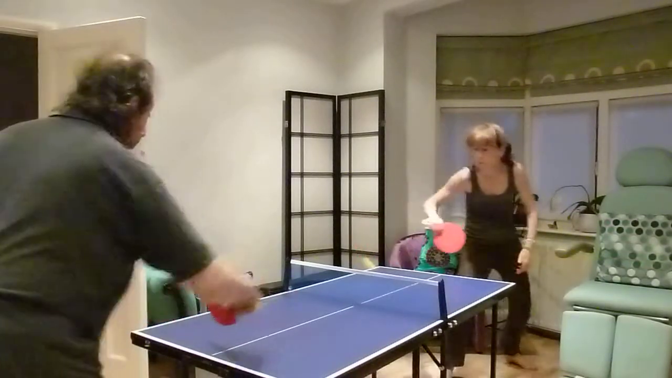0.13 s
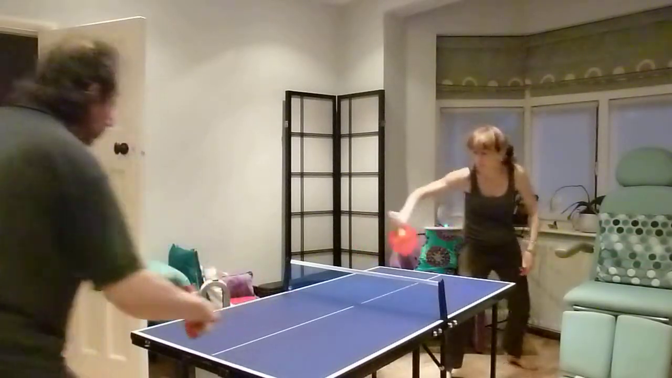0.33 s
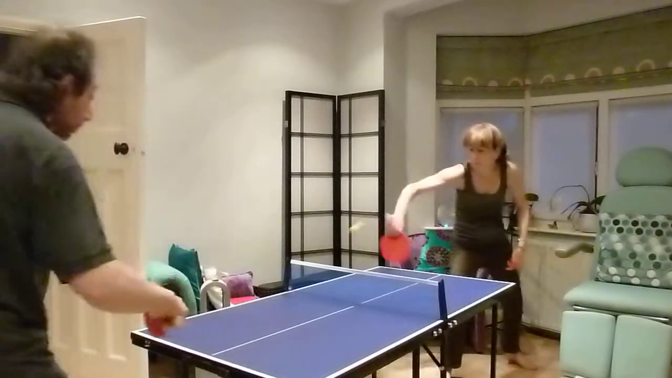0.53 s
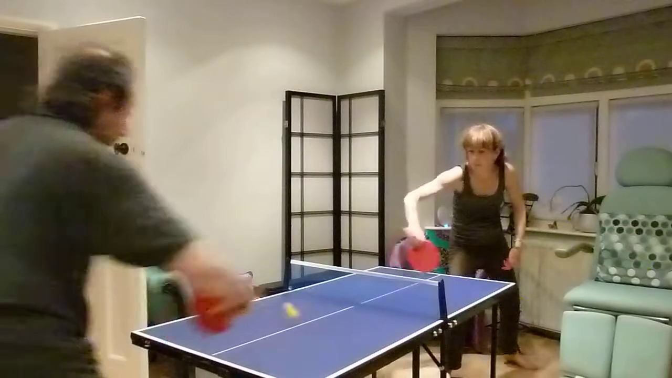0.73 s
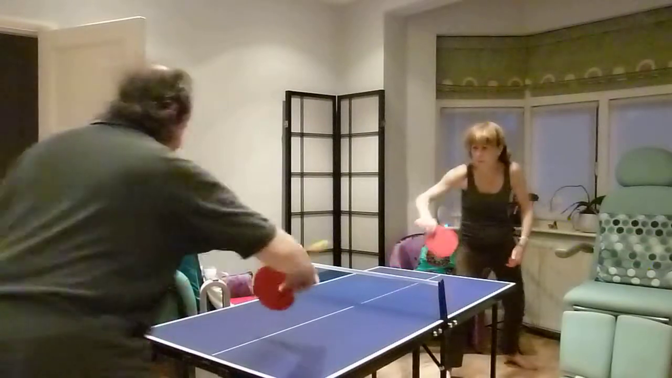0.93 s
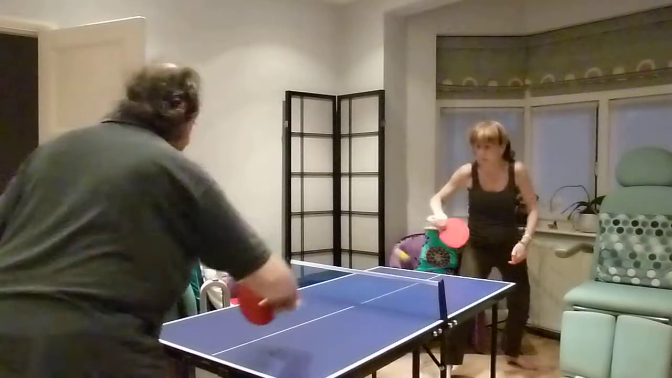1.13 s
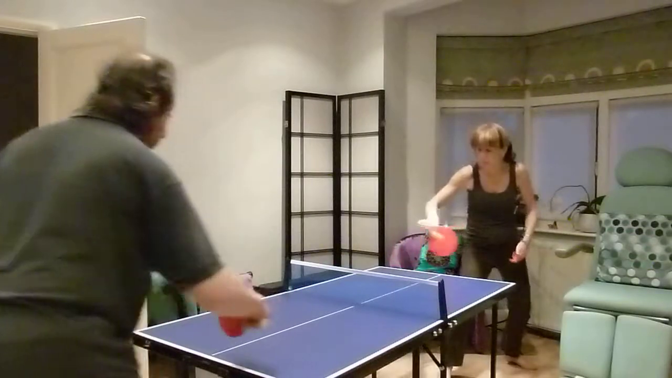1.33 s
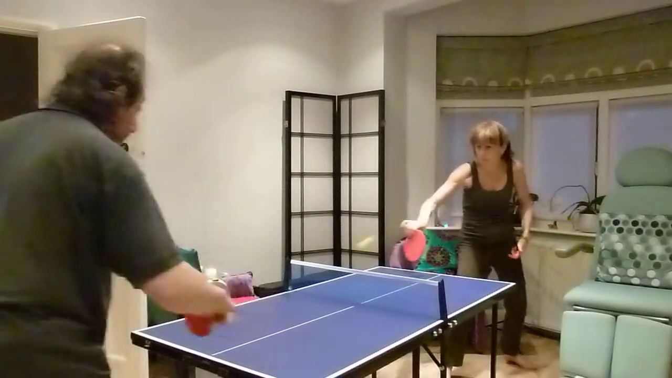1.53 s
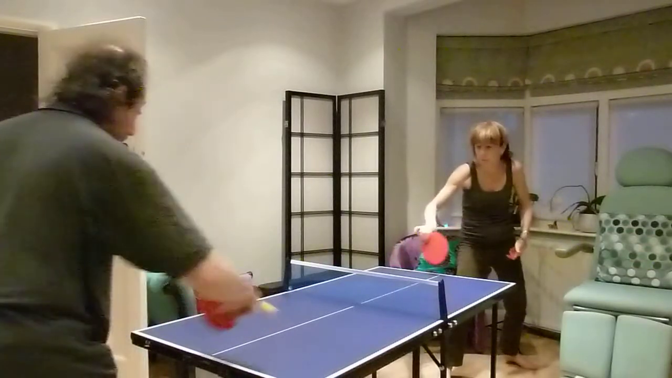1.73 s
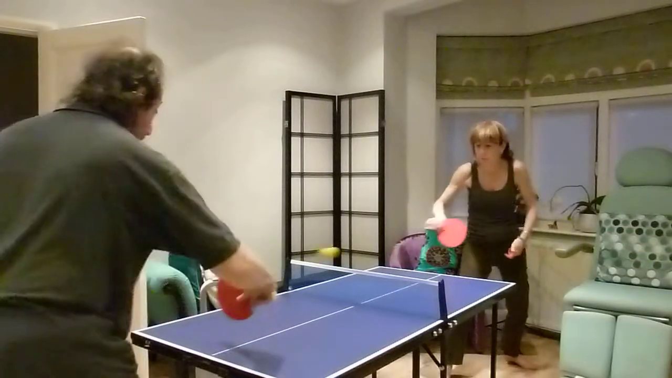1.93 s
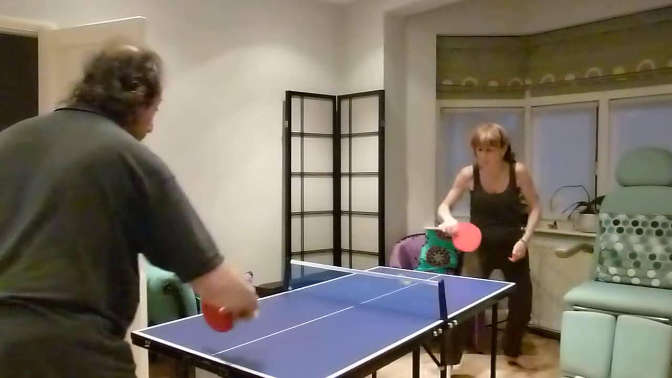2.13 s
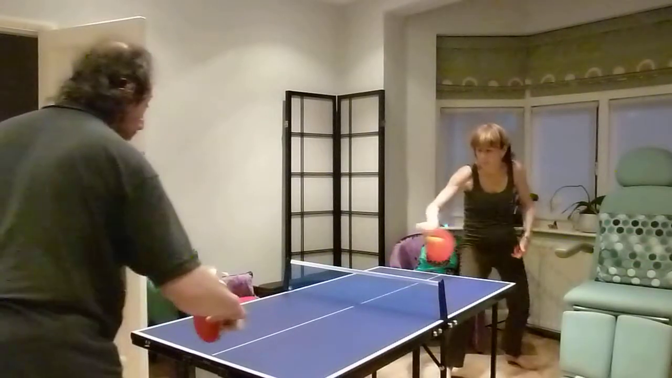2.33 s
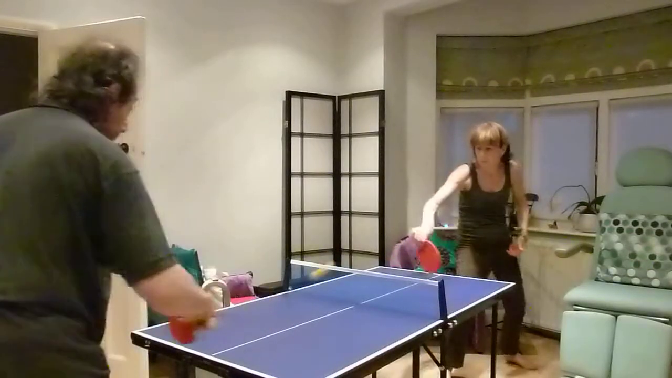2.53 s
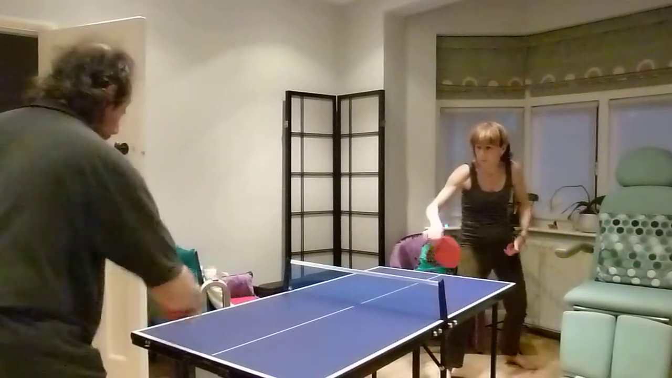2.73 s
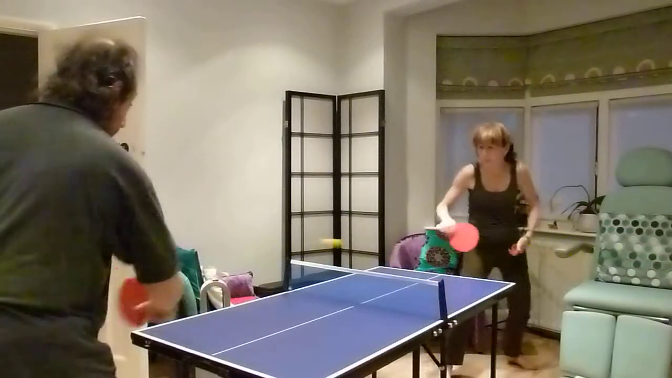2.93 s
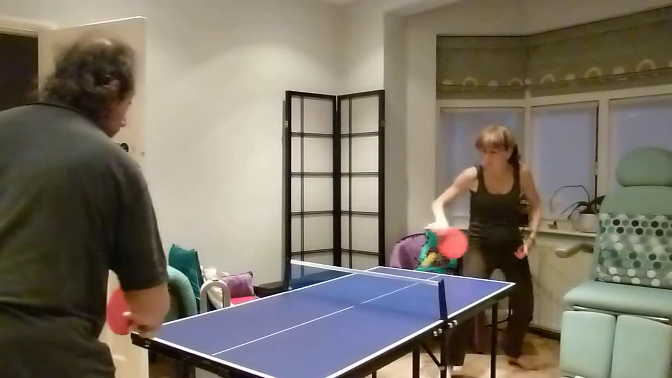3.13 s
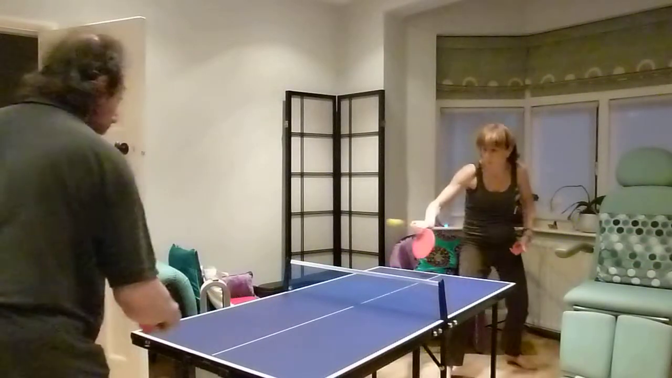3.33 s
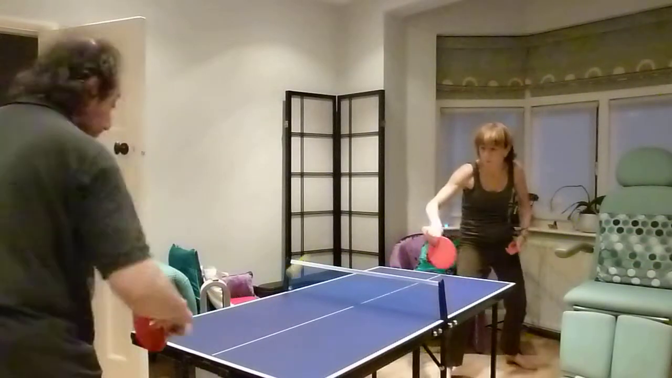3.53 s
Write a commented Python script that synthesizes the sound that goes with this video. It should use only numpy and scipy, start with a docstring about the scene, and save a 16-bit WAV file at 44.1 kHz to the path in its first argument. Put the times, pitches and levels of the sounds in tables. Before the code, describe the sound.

A table tennis rally in a small, lightly reverberant room. After a fading near stroke, far table bounces come at 0.2, 1.2, 2.2 and 3.1 seconds, each followed by a far bat click about 0.1-0.2 later. Near bounces at 0.75, 1.7 and 2.6 are answered by woody bat cracks at 0.9, 1.8 and 2.8. Faint steps, rustles and a soft thud come within the first second; quiet room tone continues.

```python
"""A table tennis rally in a small living room, heard from behind the near player.
It opens on the dying sound of a near stroke, a swish of clothes and footfalls, filtered decaying noise.
Then the ball knocks on the far half, is struck there, knocks on the near half and is struck back, in turn:
each knock is a force pulse, clicks and damped table modes; each stroke a soft crack and a blade near 900 Hz.
More steps, a swish and a thud of shifting weight come early on; quiet room tone, shaped noise, lasts throughout."""
import sys
import numpy as np
from scipy import signal
from scipy.fft import rfft, irfft, next_fast_len
from scipy.io import wavfile

SR = 44100
rng = np.random.default_rng(int(sys.argv[2]) if len(sys.argv) > 2 else 0)


def dump(signal):
    """Clip the signal to [-1, 1] and save it as 16-bit WAV at the path in sys.argv[1]."""
    limited = np.clip(np.atleast_2d(signal).T, -1, 1)
    pcm = np.round(limited * 32767).astype(np.int16)
    wavfile.write(sys.argv[1], SR, pcm)


N = 158760

# Ball on the table. Each row: start in seconds, level in dB, contact time in ms, deep boom in dB,
# upper boom in dB, tilt of the crack in dB per octave, click in dB.
FAR_BOUNCES = [(.2053, 0, 0.62, 3, 2, -0.5, 3), (1.2362, -1, 0.64, 4, 2.5, 1, -4),
               (2.1752, -2.5, 0.578, 5.5, -1.5, 1, -1), (3.137, -1.5, 0.56, -1, 3, .5, 1.5)]
NEAR_BOUNCES = [(.753, 0.34, 0.63, 0.5, 0.027, 0.22, 4.2), (1.7193, -0.071, 0.59, 0.5, 0.19, 0.18, 2),
                (2.6435, -1.2, .59, -4.5, 0.013, 0.12, 5.9)]
# Resonances of the table top. Each row: frequency in Hz, t60 in seconds, level in dB when struck on
# the far half, level in dB when struck on the near half.
TABLE_MODES = [(82.6, 0.59, -24.5, -6), (118.7, 0.29, -10, -8.5), (145.2, 0.23, -22.5, -9.5),
               (225.5, 0.067, -3.5, -1.5), (271, 0.17, -10, 4), (328, 0.081, -14, -17.5),
               (409, 0.12, -16, -9.5), (461.5, 0.11, 7, 4.5), (596, 0.36, -11, -13)]
# Bright click of the ball on the board. Each row: frequency in Hz, t60 in seconds, level in dB.
CLICK_MODES = [(1481, 0.03, 0.5), (3150, 0.019, 4.5), (4900, .014, -16.5), (6400, 0.011, -16)]
# Ball on a bat. Each row: start in seconds, level in dB, blade pitch in Hz, ring in dB,
# extra level of the upper modes in dB, tilt of the crack in dB per octave.
FAR_STROKES = [(0.3651, -3, 897, 3.5, -1, 5.9), (1.348, 0.5, 887, 2.5, -1.5, 2.9),
               (2.3489, 0, 893, 0, 7.5, 1.5), (3.2259, 0.5, 871.4, 2.5, 9.5, 3)]
NEAR_STROKES = [(-.2, 0.88, 918, 1.1, 5, 0), (.869, -2.35, 918, -1, -26, -0.1),
                (1.818, -1.8, 918.5, 1.2, -21.5, 0.6), (2.780, 1, 922.3, -1.5, -1, 0.76)]
# Resonances of the wooden blades. Each row: multiple of the blade pitch, t60 in seconds, level in dB.
FAR_BLADE_MODES = [(0.346, 0.096, -7.5), (1, 0.048, 4), (1.84, 0.071, -7)]
NEAR_BLADE_MODES = [(0.297, 0.045, -18.5), (0.998, 0.085, 5.5), (1.74, .055, -2.5), (2.351, 0.067, -10.5)]
# Spectrum of the crack of each contact. Each row: frequency in Hz, level in dB.
TABLE_CRACK = [(20, -43.5), (50, -43), (110, -10.5), (220, -1), (450, 3), (700, 0), (1050, -5.5),
               (1500, 2.5), (2200, 7.5), (2700, 9), (3300, 8), (4800, 11), (6800, 9.5), (8000, -3.5)]
FAR_BAT_CRACK = [(60, -27), (130, -15.5), (420, 9.5), (620, 3), (1000, 7.5), (1400, 9), (2000, -1.5),
                 (2700, -7.5), (3400, -21.5), (4300, -13), (5500, -26.5), (7500, -44)]
NEAR_BAT_CRACK = [(60, -3), (130, -38), (450, 7), (740, -4), (1050, 6.5), (1450, 8), (2100, 2),
                  (2700, -4.5), (3400, -17), (4500, -16), (6000, -27.5), (7500, -42)]
# Reverberation of the room. Each row: frequency in Hz, t60 in seconds, side against mid in dB.
ROOM = [(80, 0.38, -24), (200, 0.54, -20), (374, .44, -22.5), (690, .42, -15.5), (1000, 0.49, -7),
        (1500, 0.43, -10), (3170, 0.44, -2.5), (7160, 0.33, -5.5)]
# Direct sound and first reflections. Each row: delay in seconds, level in dB against the diffuse tail.
PATHS = [(0, -13), (.0015, -23.5), (.0054, -21.5), (.0076, -17.5)]
# Clothes, footfalls and weight shifting on the floor. Each row: start in seconds, level in dB,
# rise in seconds, t60 in seconds.
SWISHES = [(.02, -44.5, 0.0081, 0.8), (.86, -41.5, 0.029, 0.79)]
STEPS = [(.015, -42, 0.025, 0.6), (.165, -38, 0.014, 0.11), (1.015, -38.5, 0.012, 0.35)]
THUDS = [(.695, -39.5, .035, 0.86)]
# Spectra of these noises and of the room tone. Each row: frequency in Hz, level in dB.
SWISH_SPECTRUM = [(300, -22.5), (1000, 2.5), (2500, 4), (5500, 5), (7500, -6.5)]
STEP_SPECTRUM = [(50, -21), (150, -8), (300, -8), (500, -10.5), (1000, -29), (6000, -36.5)]
THUD_SPECTRUM = [(15, -35), (35, -9), (65, 14.5), (95, 19), (170, -10.5), (500, -5), (4000, -27)]
ROOM_TONE_SPECTRUM = [(25, -7.5), (60, 3), (115, 5), (230, 6), (500, 0), (1000, -8.5), (2000, -11),
                      (4000, -15.5), (6000, -14), (7500, -27)]
# The two microphone ports. Each row: frequency in Hz, phase lead of the left in radians,
# excess level of the left in dB.
PORTS = [(200, 0, 0), (600, -.1, .8), (860, 0, 1.8), (1080, -1.1, .3), (1500, -.85, 0), (2300, -.45, .3),
         (3000, -.6, .2), (6000, -.05, .4)]

BOUNCE_CRACK_DB, BOUNCE_RING_DB, CLICK_DB = 17, 2.5, -8.5
DEEP_BELOW_HZ, BOOM_DELAY_S = 300, .003
FAR_CRACK_DB, FAR_RING_DB, NEAR_CRACK_DB, NEAR_RING_DB = 6.5, 2, 10, 5
BLADE_DIRECT_DB, BLADE_DIRECT_T60_S = -2.5, .12
EARLY_DB, EARLY_T60_S, BUILD_S = 1, .035, .002  # early scatter, and onset time of the whole tail
ROOM_TONE_DB = -55
LOW_CUT_HZ, OVERLOAD, CUTOFF_HZ = 73, 0.48, 7650  # OVERLOAD is the amplitude limit of the rounding
LEAD_S, TAIL_S = .5, 1.0  # lead-in before time zero, length of each sound

T = np.arange(int(TAIL_S * SR)) / SR
SIZE = next_fast_len(2 * len(T))
HZ = np.maximum(np.arange(SIZE // 2 + 1) * SR / SIZE, 1)


def push(contact_ms, loss):
    """Impact: the spectrum of a half-sine force pulse that decays by exp(-loss) over the contact."""
    z = 2j * np.pi * HZ * contact_ms / 1000 + loss
    return (1 + np.exp(-z)) / (1 + (z / np.pi) ** 2)


def table(bounces, axis):
    """Modal excitation: a bounce clicks and cracks, then the board booms; axis picks the half's levels."""
    out = silence()
    for s, db, contact_ms, deep_db, upper_db, tilt_db, click_db in bounces:
        space = room()
        click = sum(direct(mode(hz, t60), CLICK_DB + click_db + mode_db)
                    for hz, t60, mode_db in CLICK_MODES)
        force = push(contact_ms, loss=0.42)
        crack = heard(force * tilted(TABLE_CRACK, tilt_db), space, BOUNCE_CRACK_DB)
        boom = 0
        for row in TABLE_MODES:
            hz, t60 = row[:2]
            boom_db = deep_db if hz < DEEP_BELOW_HZ else upper_db
            boom = boom + heard(mode(hz, t60), space, BOUNCE_RING_DB + row[axis] + boom_db)
        add(out, s, from_db(db) * (click + crack))
        add(out, s + BOOM_DELAY_S, from_db(db) * boom)
    return out


def bat(strokes, blade, crack_spectrum, crack_db, ring_db):
    """Cushioned impact: a rubber-softened crack, and blade modes heard both directly and through the room."""
    out = silence()
    for s, db, pitch_hz, blade_db, upper_db, tilt_db in strokes:
        space = room()
        sound = heard(tilted(crack_spectrum, tilt_db), space, crack_db)
        for k, (ratio, t60, mode_db) in enumerate(blade):
            hz = pitch_hz * ratio
            level_db = ring_db + blade_db + mode_db
            if k > 1:  # modes above the blade pitch
                level_db += upper_db
            sound += heard(mode(hz, t60), space, level_db)
            sound += direct(mode(hz, BLADE_DIRECT_T60_S), level_db + BLADE_DIRECT_DB)
        add(out, s, from_db(db) * sound)
    return out


def movements(events, spectrum):
    """Friction and soft impact: the players' noises, rising linearly and then dying exponentially."""
    out = silence()
    for s, db, rise, t60 in events:
        swell = np.minimum(T / rise, 1)
        decay = dying(t60) / np.interp(np.minimum(T, rise), T, dying(t60))  # starts after the rise
        add(out, s, from_db(db) * diffuse(spectrum, len(T)) * swell * decay)
    return out


def room_tone():
    """Stationary noise: a steady diffuse background of fixed spectrum."""
    return from_db(ROOM_TONE_DB) * diffuse(ROOM_TONE_SPECTRUM, N)


def room():
    """Reverberation: direct sound, first reflections, early scatter and a tail dying by band."""
    noise = rfft(diffuse([(1, 0), (SR, 0)], len(T)))
    hz = np.maximum(np.arange(noise.shape[1]) / TAIL_S, 1)
    centres = np.log(np.array(ROOM)[:, 0])
    early = from_db(EARLY_DB) * dying(EARLY_T60_S)
    tail = 0
    for share, (_, t60, _) in zip(np.eye(len(ROOM)), ROOM):
        # neighbouring bands cross-fade and sum to the whole noise
        band = irfft(noise * np.interp(np.log(hz), centres, share), len(T))
        tail = tail + band * (dying(t60) + early)
    tail = tail * (1 - np.exp(-T / BUILD_S))
    paths = sum(from_db(db) * np.exp(-2j * np.pi * HZ * s) for s, db in PATHS)
    return rfft(tail / np.sqrt(np.sum(tail ** 2) / 2), SIZE) + paths


def heard(source, space, db):
    """Convolution: a source spectrum times a room response, set to a given energy."""
    x = irfft(source * space, SIZE)[:, :len(T)]
    return from_db(db) * x / np.sqrt(np.sum(x ** 2) / 2)


def direct(source, db):
    """Free-field propagation: a source that goes straight to both microphones."""
    return heard(source, np.ones((2, 1)), db)


def mode(hz, t60):
    """Resonance: the response of one damped oscillator, its bandwidth set by its t60."""
    width = np.log(1000) / (np.pi * t60)
    return 1j * HZ * width / (hz ** 2 - HZ ** 2 + 1j * HZ * width)


def tilted(spectrum, tilt_db):
    """Spectral slope: a crack's colour, brighter or duller about 1 kHz."""
    return colour(at_hz(spectrum, HZ) + tilt_db * np.log2(np.maximum(HZ, 100) / 1000))


def colour(db):
    """Minimum phase: the causal response with the given levels, by folding the cepstrum."""
    cepstrum = irfft(np.log(from_db(db)), SIZE)
    cepstrum[1:SIZE // 2] *= 2
    cepstrum[SIZE // 2 + 1:] = 0
    return np.exp(rfft(cepstrum))


def diffuse(spectrum, size):
    """Diffuse field: stereo noise of rms 1, alike in the bass and wider in the treble."""
    hz = np.maximum(np.arange(size // 2 + 1) * SR / size, 1)
    mid, side = rfft(rng.standard_normal((2, size)))
    side = side * from_db(at_hz(ROOM, hz, axis=2))
    stereo = mid + side * [[1], [-1]]
    x = irfft(stereo * from_db(at_hz(spectrum, hz)), size)
    return x / x.std()


def dying(t60):
    """Exponential decay: a fall of 60 dB in t60 seconds."""
    return from_db(-60 * T / t60)


def from_db(db):
    """Logarithmic level: decibels to amplitude gain."""
    return 10 ** (np.asarray(db) / 20)


def at_hz(points, hz, axis=1):
    """Logarithmic frequency: interpolate a table column along log Hz."""
    points = np.array(points)
    return np.interp(np.log(hz), np.log(points[:, 0]), points[:, axis])


def silence():
    """Zero pressure: an empty stereo track with a lead-in."""
    return np.zeros((2, N + int(LEAD_S * SR)))


def add(out, s, sound):
    """Superposition: mix a sound in at a time in seconds."""
    i = int((s + LEAD_S) * SR)
    out[:, i:i + sound.shape[1]] += sound[:, :out.shape[1] - i]


def scene():
    """Superposition of bounces, strokes, the players' movements and the room tone."""
    rally = table(FAR_BOUNCES, axis=2) + table(NEAR_BOUNCES, axis=3)
    rally += bat(FAR_STROKES, FAR_BLADE_MODES, FAR_BAT_CRACK, FAR_CRACK_DB, FAR_RING_DB)
    rally += bat(NEAR_STROKES, NEAR_BLADE_MODES, NEAR_BAT_CRACK, NEAR_CRACK_DB, NEAR_RING_DB)
    players = movements(SWISHES, SWISH_SPECTRUM) + movements(STEPS, STEP_SPECTRUM)
    players += movements(THUDS, THUD_SPECTRUM)
    return (rally + players)[:, -N:] + room_tone()  # the lead-in is dropped


def record(dry):
    """Transduction: the left port differs in phase and level; bass is cut, peaks rounded, the top cut."""
    size = next_fast_len(N + SR)
    hz = np.maximum(np.arange(size // 2 + 1) * SR / size, 1)
    port = np.exp(1j * at_hz(PORTS, hz)) * from_db(at_hz(PORTS, hz, axis=2))
    left = irfft(rfft(dry[0], size) * port, size)[:N]
    low_cut = signal.butter(2, LOW_CUT_HZ, "high", fs=SR, output="sos")
    x = signal.sosfilt(low_cut, [left, dry[1]])
    rounded = OVERLOAD * np.tanh(x / OVERLOAD)
    top_cut = signal.ellip(8, .5, 70, CUTOFF_HZ, fs=SR, output="sos")  # ripple and rejection in dB
    return signal.sosfilt(top_cut, rounded)


dry = scene()
out = record(dry)
dump(out)
```